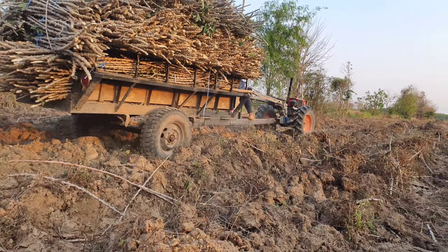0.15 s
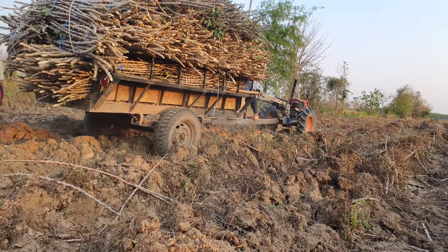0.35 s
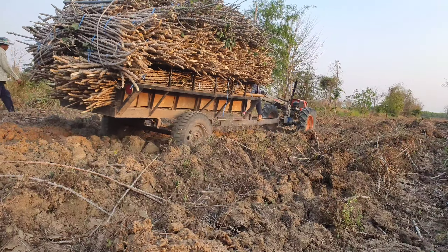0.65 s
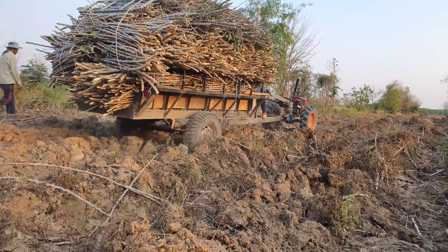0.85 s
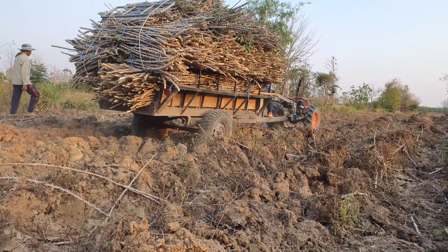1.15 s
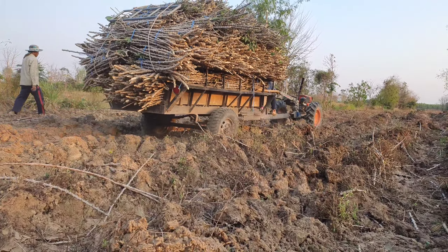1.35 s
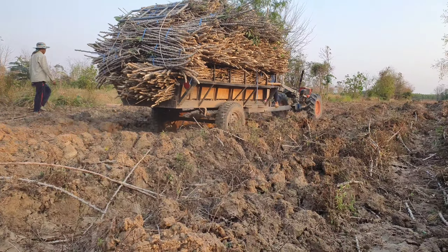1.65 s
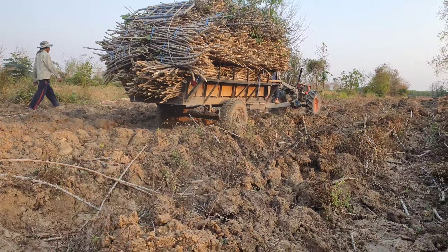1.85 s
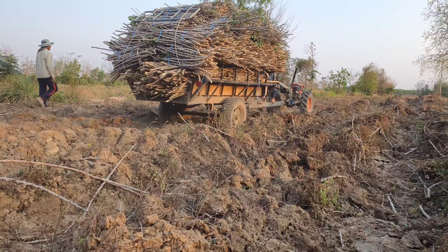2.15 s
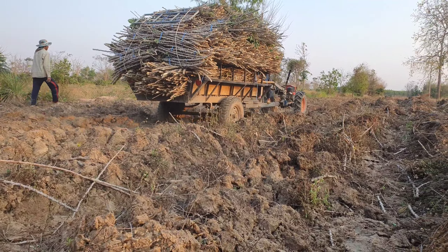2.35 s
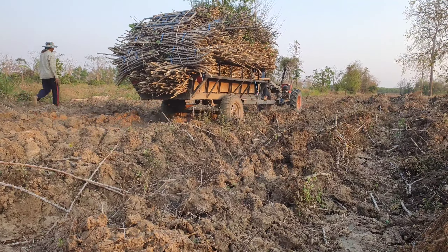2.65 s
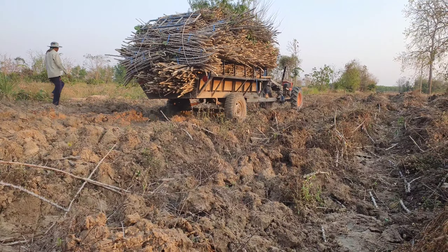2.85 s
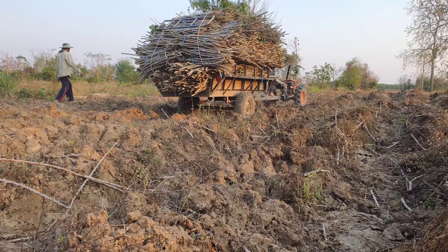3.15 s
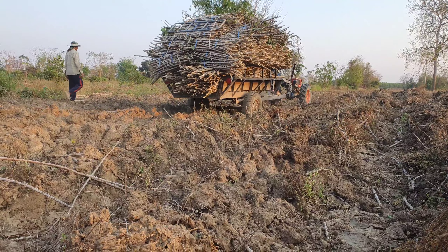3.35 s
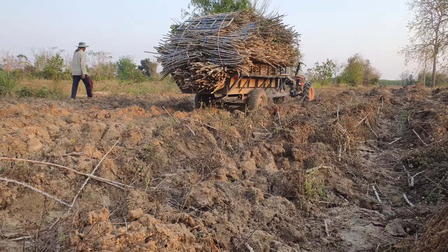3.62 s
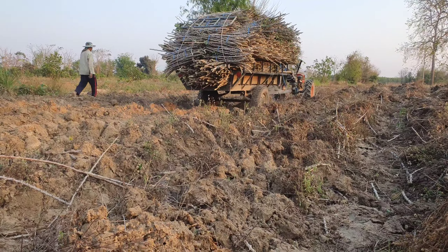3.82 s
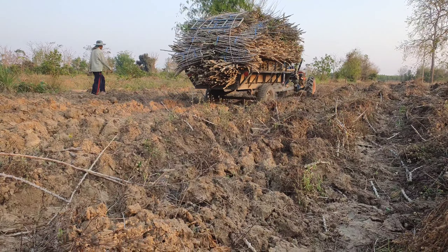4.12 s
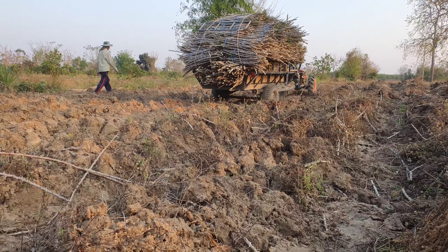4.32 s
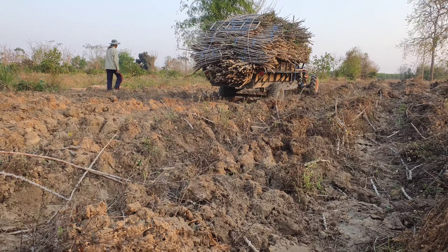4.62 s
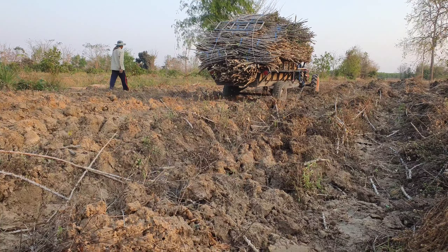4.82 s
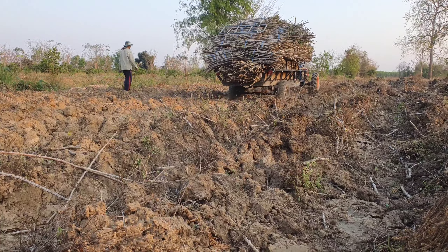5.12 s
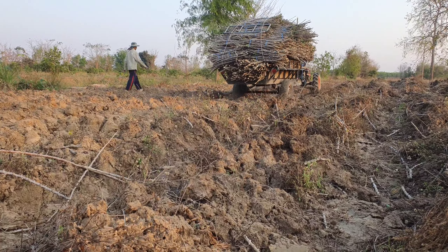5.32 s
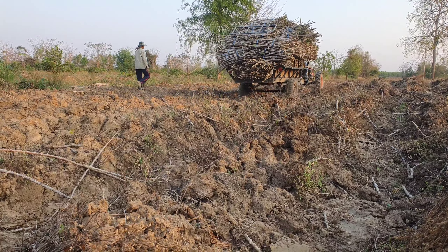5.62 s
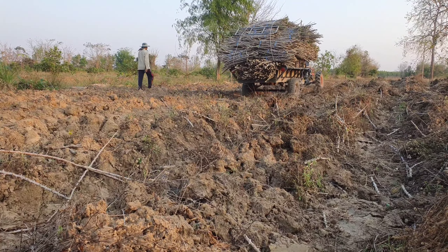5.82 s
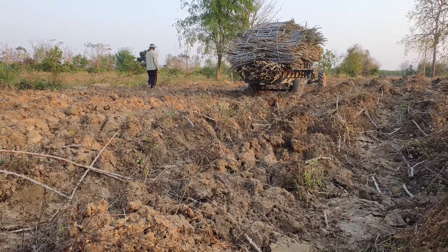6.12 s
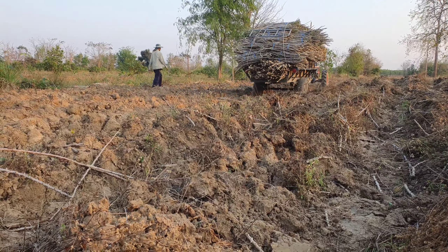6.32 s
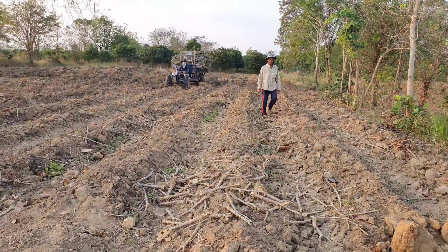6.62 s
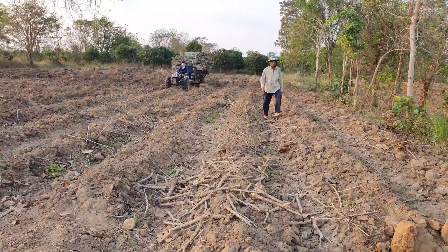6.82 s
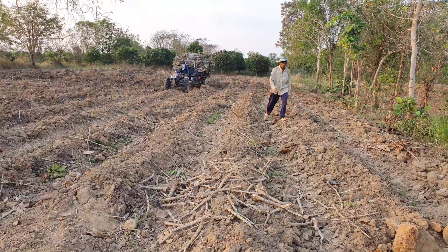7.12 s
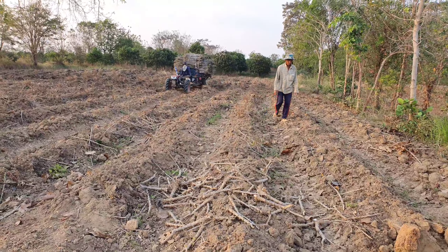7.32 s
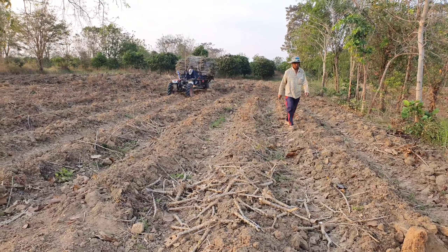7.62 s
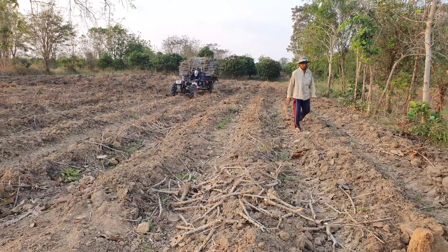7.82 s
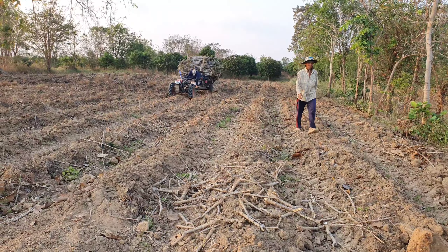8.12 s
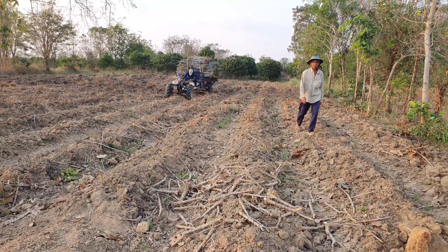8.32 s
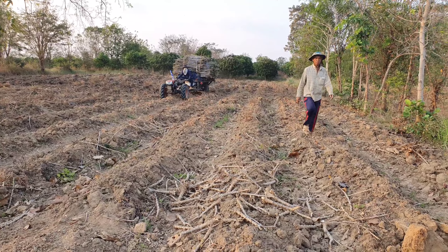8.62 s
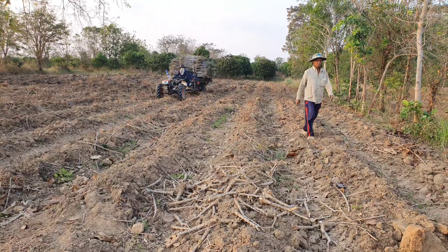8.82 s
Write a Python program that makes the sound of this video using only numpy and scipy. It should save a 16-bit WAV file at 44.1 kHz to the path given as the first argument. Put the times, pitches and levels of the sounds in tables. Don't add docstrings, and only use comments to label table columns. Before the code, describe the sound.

Fast hollow diesel put-put with metallic knocks and cart rattle slows, labours, speeds up, then abruptly becomes slow, separate chugs.

```python
import sys
import numpy as np
from scipy import signal
from scipy.fft import rfft, irfft, next_fast_len
from scipy.io import wavfile
from scipy.ndimage import uniform_filter1d

SR = 44100
rng = np.random.default_rng(int(sys.argv[2]) if len(sys.argv) > 2 else 0)


def pcm_store(signal):
    levels = np.round(np.clip(np.atleast_2d(signal), -1, 1) * 32767)
    wavfile.write(sys.argv[1], SR, levels.astype(np.int16).T)


def linear_from_db(decibels):
    return 10 ** (np.asarray(decibels, float) / 20)


N = 395136
TIME = np.arange(N) / SR


def unit(x):
    return x / np.sqrt(np.mean(x ** 2) + 1e-20)


def along(points, hz):
    f, value = np.transpose(points)
    return np.interp(np.log(hz + 1), np.log(f + 1), value)


def column(rows, s, order):
    rows = np.array(rows)
    return np.interp(s, rows[:, 0], rows[:, order])


def wobble(rate):
    knots = rng.standard_normal(int(N * rate / SR) + 2)
    return np.interp(TIME * rate, np.arange(len(knots)), knots)


def filtered(x, response):
    m = next_fast_len(N + SR // 2)
    spectrum = rfft(x, m) * response(np.fft.rfftfreq(m, 1 / SR))
    return irfft(spectrum, m)[..., :N]


def coloured(x, response):
    power = np.mean(abs(response(np.linspace(0, SR / 2, num=4096))) ** 2)
    return filtered(x, response) / np.sqrt(power)


def modes(rows, f):
    return sum(gain * 1j * f * width / (c * c - f * f + 1j * f * width) for c, width, gain in rows)


def train(s, size, shape):
    out = np.zeros(N + 2 * SR)
    for at, gain in zip(np.round(s * SR).astype(int) + SR // 2, size):
        out[at:at + len(shape)] += gain * shape
    return out[SR // 2:][:N]


def firings(speed):
    s = np.arange(-.2, speed[-1][0] - speed[0][0] + .15, .001) + speed[0][0]
    rate = column(speed, s, order=1)
    turns = (np.cumsum(rate) - rate / 2) / 1000
    turns = turns - np.interp(speed[0][0], s, turns)
    start = np.interp(np.arange(np.ceil(turns[0]), turns[-1]), turns, s)
    return start, np.gradient(start)


def controls(start, pose, hard):
    extra = sum(db * (np.arange(len(start)) == np.argmin(abs(start - s))) for s, db in hard)
    return np.array([column(pose, start, order=1), column(pose, start, order=2), extra])


# (part of cycle [0-1], width [ms], push + or pull - [linear])
COASTING_GAS = [(.022, 2.93, -35.5), (.031, 4.98, 45), (.091, 1.22, -9.4), (.272, 1.39, -7.3),
                (.424, 2.14, -8)]
LABOURING_GAS = [(-.154, 2.06, 34.6), (-.045, 2.37, -42.4), (.152, .85, -3.6), (.17, 2.3, 11.9),
                 (.407, 1.2, -2.2)]
FREE_GAS = [(-.14, 1.9, 4.9), (-.059, 3.27, -52.3), (.094, 1.29, -1.55), (.171, 3.65, 13.8),
            (.36, 3.37, 32)]
SLOW_GAS = [(-.008, 2.43, 24), (.125, 2.94, 58), (.244, .3, 4), (.285, .9, 6.6), (.341, .7, -3.3)]
# (centre [Hz], width [Hz], signed gain [linear])
COASTING_PIPE = [(87.9, 15.3, 1), (200, 15, -.79), (274, 32, .78)]
LABOURING_PIPE = [(94.3, 14.2, 1), (120, 76, -.42), (295, 91, .54)]
FREE_PIPE = [(92.2, 15.3, 1), (194, 36, -3), (254, 30, 2.3)]
SLOW_PIPE = [(93.3, 8.5, 1), (137, 150, -.12), (265, 120, .2)]


def exhaust_boom(cycle, size, gas, pipe):
    start, length = cycle
    t_ms = np.arange(-700, 701) / SR * 1000
    flow = 0
    for part, width_ms, push in gas:
        bell = np.exp(-(t_ms / width_ms) ** 2 / 2)
        flow = flow + train(start + part * length + t_ms[0] / 1000, push * size, bell / bell.sum())
    return filtered(flow, lambda f: modes(pipe, f) / (1 + (f / 750) ** 4))


def bursts(cycle, size, strokes, scatter_db, grain_db, repeat, channels):
    start, length = cycle
    t = np.arange(SR // 11) / SR
    gate, same = 0, 0
    for part, rise_ms, t60_ms, db in strokes:
        luck = rng.standard_normal((len(start), 2))
        hump = (1 - np.exp(-1000 * t / rise_ms)) ** 2 * linear_from_db(db - 60000 * t / t60_ms)
        moment = start + part * length + .00015 * luck[:, 0]
        strength = size * linear_from_db(scatter_db * luck[:, 1])
        gate = gate + train(moment, strength, hump)
        if repeat:
            same = same + train(moment, strength, hump * rng.standard_normal(len(t)))
    grains = unit(linear_from_db(grain_db * wobble(700)) * rng.standard_normal((channels, N)))
    return repeat * same + gate * grains


# (time [s], delay [ms])
GROUND_ECHO = [(0, 0.87), (1.5, 1.03), (1.8, 1.07), (2.7, 1.22), (4, 1.05), (5.2, 0.82), (6.7, 0.8),
               (6.8, 0.46), (9, 0.48)]


def grounded(x, db):
    late = TIME - column(GROUND_ECHO, TIME, order=1) / 1000
    return x - linear_from_db(db) * np.interp(late, TIME, x)


# (part of cycle [0-1], rise [ms], t60 [ms], level [dB])
COASTING_KNOCK = [(-.01, 0.94, 50, 11.5), (.12, 0.93, 52, 6)]
LABOURING_KNOCK = [(-.38, 2, 90.5, 5.1), (-.16, 2.2, 51, 10.5), (.05, 2, 60, 1), (.2, 1.2, 50, 1.6)]
FREE_KNOCK = [(-.37, 3.5, 91, 9.1), (-.15, 0.79, 60.3, 5.1), (.05, 2, 60, 2), (.2, 0.48, 48, 2.9)]
SLOW_KNOCK = [(-.29, 0.73, 58, 11.8), (-.14, 1.3, 39.3, 0.87), (-.03, 1.5, 60, 7), (.23, 1.5, 59.5, 0.79)]
# (centre [Hz], width [Hz], level [dB])
COASTING_BODY = [(301, 50, -6.5), (472, 12.4, -4), (624, 36, -5), (794, 25, -2), (1307, 54, 6.5),
                 (1630, 160, -4.5), (1884, 135, -0.5)]
LABOURING_BODY = [(302, 58, -3.5), (573, 43, -2.5), (708, 49, -3.5), (917, 31, -4), (1350, 206, 2),
                  (1800, 110, 3.5), (2430, 210, -14), (3120, 120, -7)]
FREE_BODY = [(289, 67, -3.5), (573, 42, -9.5), (696, 54, -8.5), (888, 32, -0.5), (1060, 360, -5),
             (1330, 150, 5), (1680, 240, -7.5), (2550, 370, -3.5)]
SLOW_BODY = [(259, 99, -12.5), (536, 3.1, -5.5), (693, 92, -4), (858, 85, 2.5), (956, 76, 5),
             (1305, 183, 4.5), (1676, 164, 1), (2550, 250, -4), (3160, 200, -4.5), (4000, 93, -1)]


def body_knock(cycle, size, knocks, body):
    blows = bursts(cycle, size, knocks, scatter_db=1.2, grain_db=3.5, repeat=3.6, channels=1)[0]
    ring = [(c, width, (-1) ** k * linear_from_db(level)) for k, (c, width, level) in enumerate(body)]
    return linear_from_db(-5.5) * grounded(coloured(blows, lambda f: modes(ring, f)), db=-10.5)


# (part of cycle [0-1], rise [ms], t60 [ms], level [dB])
COASTING_PUFF = [(-.015, 3.6, 40.6, 21.5), (.4, 1, 35, -8)]
LABOURING_PUFF = [(-.38, 0.91, 89, -10), (-.165, 1.44, 24.5, 19), (.04, 2.5, 30, 15), (.4, 1.2, 30, -4)]
FREE_PUFF = [(-.37, 0.56, 88.5, -2), (-.155, 1.52, 39.4, 14.5), (.04, 3, 50, 6), (.39, 1.2, 30, -2)]
SLOW_PUFF = [(-.29, 2.3, 48.4, 0), (-.03, 1.17, 43, 14), (.14, 1.5, 50, 8), (.51, 1, 40, -11)]


def valve_puffs(cycle, size, valves):
    return bursts(cycle, size, valves, scatter_db=0.7, grain_db=2.5, repeat=0, channels=2)


# (frequency [Hz], share [0-1])
LEFT_ALONE = [(100, 0.57), (1500, 0.93), (4000, 0.48), (10000, 0.84)]


def airborne(pair, spectrum, treble_db, size):
    hz, t, z = signal.stft(pair, SR, nperseg=size)
    field = uniform_filter1d(rng.standard_normal(z.shape[1:]), 5, 0)
    field = uniform_filter1d(field, 8, 1)
    shelf_db = 1 / (1 + (5200 / (hz[:, None] + 1)) ** 6) * np.interp(t, TIME, treble_db)
    own = np.clip(along(LEFT_ALONE, hz), 0, 1)[:, None]
    z = np.array([own * z[0] + np.sqrt(1 - own ** 2) * z[1], z[1]])
    patches_db = 2.0 * unit(field)
    z = z * unit(linear_from_db(along(spectrum, hz)))[:, None] * linear_from_db(shelf_db + patches_db)
    return signal.istft(z, SR, nperseg=size)[1][:, :N]


# (frequency [Hz], level [dB])
AWAY_HISS = [(300, -17), (600, -7.5), (1300, -8), (2000, -2), (3300, 1), (4500, -4.5), (6000, -11.5),
             (7500, -10), (9500, -22.5), (11000, -21.5), (13000, -13), (15500, -24)]
BACK_HISS = [(300, -58), (700, 4.5), (1500, -17), (2000, -24), (3000, -0.5), (4300, -6.5), (6000, -15.5),
             (8000, -17.5), (9500, -24), (13000, -25), (15500, -35)]


def valve_hiss(puffs, spectrum, treble_db):
    return linear_from_db(4.5) * airborne(puffs, spectrum, treble_db + 11.5, size=256)


# (boom [dB], knock [dB], hiss [dB], treble of the hiss [dB])
COASTING_LOUD = (26.5, -27, -31.5, -6.5)
LABOURING_LOUD = (26.5, -29, -29, -10)
FREE_LOUD = (26, -31, -31, -14.5)
SLOW_LOUD = (25, -32, -35, -10)
# (per nearness [dB/dB], per turning [dB/dB], per hard firing [dB/dB])
BOOM_CHANGE = (0.97, 0.01, 0.2)
KNOCK_CHANGE = (1.26, -0.12, 0.75)
HISS_CHANGE = (0.43, 1.26, 0.71)
TREBLE_CHANGE = (.1, -0.21, 0.94)


def engine(cycle, control, states, hiss):
    boom_gain, knock_gain, hiss_gain = linear_from_db(np.array([BOOM_CHANGE, KNOCK_CHANGE, HISS_CHANGE]) @ control)
    sound, puffs = 0, 0
    treble_db = TREBLE_CHANGE @ control
    for share, loudness, gas, pipe, knocks, body, valves in states:
        boom_db, knock_db, hiss_db, top_db = loudness
        weight = share(cycle[0])
        uneven_db = .5 * rng.standard_normal(len(weight))
        sound = sound + exhaust_boom(cycle, weight * boom_gain * linear_from_db(boom_db + uneven_db), gas, pipe)
        sound = sound + body_knock(cycle, weight * knock_gain * linear_from_db(knock_db), knocks, body)
        puffs = puffs + valve_puffs(cycle, weight * hiss_gain * linear_from_db(hiss_db), valves)
        treble_db = treble_db + weight * top_db
    treble_db = np.interp(TIME, cycle[0], treble_db)
    return sound + valve_hiss(puffs, hiss, treble_db), treble_db


# (frequency [Hz], level [dB])
AWAY_RATTLE = [(40, 8), (120, -8), (250, 2.5), (450, -4.5), (850, -3.5), (1350, 1), (2000, -4),
               (3500, -3.5), (5000, -13.5), (7800, -15.5), (8800, -26), (10300, -26), (12500, -21.5),
               (15500, -25)]
BACK_RATTLE = [(40, 2), (120, 11.5), (280, 2), (480, -11), (900, 4), (1600, -2.5), (2000, -4), (3000, -0.5),
               (4300, -5.5), (7500, -10), (9500, -17.5), (11000, -15.5), (15500, -22)]
# (leaving [dB], coming [dB])
RATTLE_LEVEL = (-33.5, -37)
# (per nearness [dB/dB], per turning [dB/dB], per hard firing [dB/dB])
RATTLE_CHANGE = (-0.15, 0.11, 0.06)


def rattle(cycle, control, db, treble_db, spectrum):
    start, length = cycle
    grains = unit(linear_from_db(2.3 * wobble(300)) * rng.standard_normal((2, N)))
    pair = airborne(grains, spectrum, 0.4 * treble_db + 5, size=512)
    turns = uniform_filter1d(np.interp(TIME, start, np.arange(len(start))), size=4000)
    rate = np.interp(TIME, start, 1 / length)
    swell_db = -13.5 + 4 * (rate - 16) + 3 * wobble(3.6)
    whine = linear_from_db(swell_db) * np.sin(2 * np.pi * 56 * turns)
    level = linear_from_db(db + np.interp(TIME, start, RATTLE_CHANGE @ control) + 4.0)
    return level * (whine + np.array([grounded(side, db=-20.5) for side in pair]))


def tractor(speed, pose, hard, states, hiss, rattle_db, spectrum):
    cycle = firings(speed)
    control = controls(cycle[0], pose, hard)
    sound, treble_db = engine(cycle, control, states, hiss)
    return sound, rattle(cycle, control, rattle_db, treble_db, spectrum)


# (frequency [Hz], t60 [s])
FURROWS = [(300, 0.24), (2000, 0.058), (10000, 0.025)]


def scattered(x):
    hz, t, z = signal.stft(rng.standard_normal((2, SR // 6)), SR, nperseg=128)
    decay = linear_from_db(-60 * t / along(FURROWS, hz)[:, None])
    tail = signal.istft(z * decay * (hz > 400)[:, None], SR, nperseg=128)[1]
    return signal.oaconvolve(x[None], tail / np.linalg.norm(tail[0]), axes=1)[:, :N]


# (frequency [Hz], level [dB])
AWAY_LEFT = [(200, 0), (380, -4), (850, 1), (1300, -7), (2000, -10), (2700, -6), (3600, -13.5),
             (5000, -8.5), (7000, -5.5), (9500, -1), (13000, -8.5)]
BACK_LEFT = [(200, -0.5), (400, -1), (1000, 0.5), (1300, -6.5), (1600, 2.5), (2500, -1), (3000, -6),
             (4400, -9), (6000, -11), (8000, -3.5), (9500, -10), (13000, -6.5)]
# (frequency [Hz], lead [rad])
AWAY_LEAD = [(0, -4.5), (780, 0.5), (1210, -2), (1890, -1.5), (2500, -2), (2840, -2.5), (3270, -3),
             (3620, -1.5), (4390, -2.5), (5510, -2), (7670, -2.5), (8350, -1.5), (11500, -7.5), (16200, 3)]
BACK_LEAD = [(0, 4), (1120, -0.04), (1460, 1.35), (2670, 0.73), (2930, 0.83), (5940, 2.5), (7320, 5.5),
             (8530, 3.5), (9650, 8.5), (12500, 6.5), (13400, 12), (14000, 16), (15800, 22), (16200, 40)]


def ports(sound, floor, left_db, lead):
    pair = sound + linear_from_db(-19.0) * scattered(sound[1]) + floor

    def shading(f):
        phase = along(lead, f) * (1 - np.exp(-(f / 220) ** 2))
        return linear_from_db(along(left_db, f)) * np.exp(1j * phase)

    return np.array([filtered(pair[0], shading), pair[1]])


# (time [s], rate [cycles/s])
AWAY_SPEED = [
    (-.0633, 16.139),
    (.43, 14.988),
    (1.71, 13.158),
    (2.41, 13.555),
    (2.85, 14.136),
    (3.45, 14.614),
    (3.83, 14.559),
    (5.1, 15.724),
    (5.81, 15.933),
    (6.625, 16.55),
]
# (time [s], nearness [dB], valve side turned to the microphones [dB])
AWAY_POSE = [(0, -1.5, -1.5), (.15, 0.5, 0.5), (1.1, 0.5, -1), (1.55, 0, 0.5), (2.7, -0.6, 3), (3.5, -2, 1),
             (4.15, 0, 6), (4.5, -.5, 2.5), (5.05, 0.3, 2), (6.1, 0, -2.5), (6.5, -2, -3.5),
             (6.65, -0.5, -1)]
# (time [s], level [dB])
AWAY_HARD = [(.79, 0.5), (1.66, 0.5), (2.03, 2), (2.33, 0.5), (2.55, 1), (2.7, 0), (2.77, -1), (2.84, 2),
             (3.67, 0.5), (3.74, 1.5), (3.88, 0), (4.08, 1), (4.22, 1.5), (5.07, 2.5), (5.51, -0.5)]
# (time [s], coasting [0-1], labouring [0-1], running free [0-1])
AWAY_STATE = [
    (0, 1, 0, 0),
    (1.52, 1, 0, 0),
    (1.59, .85, .15, 0),
    (1.66, .4, .6, 0),
    (1.8, 0, 1, 0),
    (3.6, 0, 1, 0),
    (4.8, 0, 0, 1),
]


def leaving():
    coasting, labouring, free = (lambda s, k=k: column(AWAY_STATE, s, order=k) for k in range(1, 4))
    states = [
        (coasting, COASTING_LOUD, COASTING_GAS, COASTING_PIPE, COASTING_KNOCK, COASTING_BODY, COASTING_PUFF),
        (labouring, LABOURING_LOUD, LABOURING_GAS, LABOURING_PIPE,
         LABOURING_KNOCK, LABOURING_BODY, LABOURING_PUFF),
        (free, FREE_LOUD, FREE_GAS, FREE_PIPE, FREE_KNOCK, FREE_BODY, FREE_PUFF)]
    pass_by = tractor(AWAY_SPEED, AWAY_POSE, AWAY_HARD, states, AWAY_HISS, RATTLE_LEVEL[0], AWAY_RATTLE)
    return ports(*pass_by, AWAY_LEFT, AWAY_LEAD)


# (time [s], rate [cycles/s])
BACK_SPEED = [
    (6.77, 9.795),
    (6.95, 9.408),
    (7.27, 9.731),
    (7.47, 9.347),
    (8.18, 9.543),
    (8.26, 9.745),
    (8.64, 9.717),
    (8.957, 10.014),
]
# (time [s], nearness [dB], valve side turned to the microphones [dB])
BACK_POSE = [
    (6.77, -0.9, -0.35),
    (7.5, -0.65, -0.51),
    (8.96, 0.55, 0.53),
]
# (time [s], level [dB])
BACK_HARD = [
    (6.77, 2),
    (6.87, -5),
    (7.29, 0),
    (7.5, -0.5),
    (7.61, 5),
    (7.82, 3.5),
    (8.24, 3),
    (8.76, 3.5),
    (8.86, 2.5),
    (8.96, 2.5),
]


def coming_back():
    states = [(np.ones_like, SLOW_LOUD, SLOW_GAS, SLOW_PIPE, SLOW_KNOCK, SLOW_BODY, SLOW_PUFF)]
    pass_by = tractor(BACK_SPEED, BACK_POSE, BACK_HARD, states, BACK_HISS, RATTLE_LEVEL[1], BACK_RATTLE)
    return ports(*pass_by, BACK_LEFT, BACK_LEAD)


# (start of cross-fade [s], end [s])
CHANGE = (6.705, 6.74)


def scene():
    fade = np.interp(TIME, CHANGE, (0, 1))
    return (1 - fade) * leaving() + fade * coming_back()


def low_pass(x):
    return signal.sosfilt(signal.butter(12, 16650, fs=SR, output="sos"), x)


def record(dry):
    held = dry / (1 + np.abs(dry / .97) ** 5) ** (1 / 5)
    band = filtered(held, lambda f: (f < 15900) / (1 + (22 / (f + 1)) ** 4))
    return low_pass(band)


dry = scene()
out = record(dry)
pcm_store(out)
```